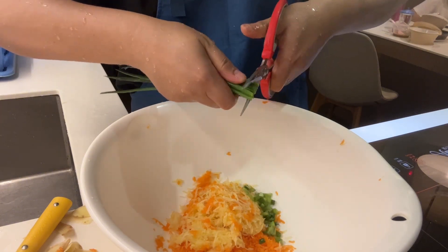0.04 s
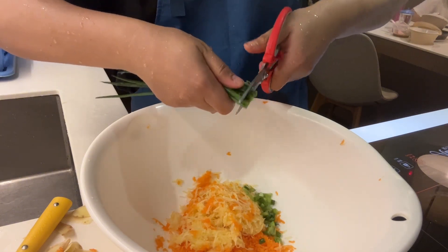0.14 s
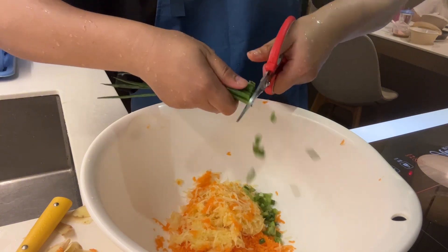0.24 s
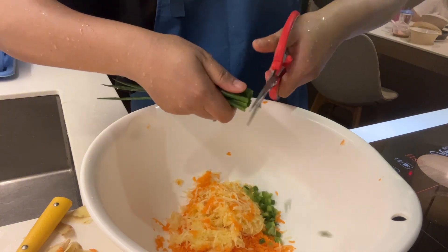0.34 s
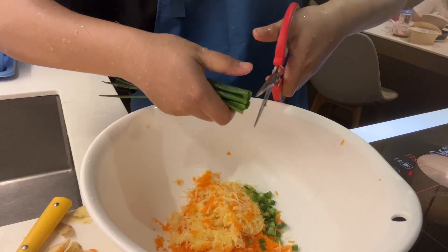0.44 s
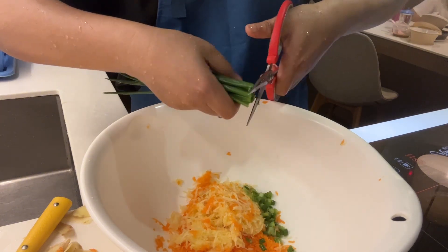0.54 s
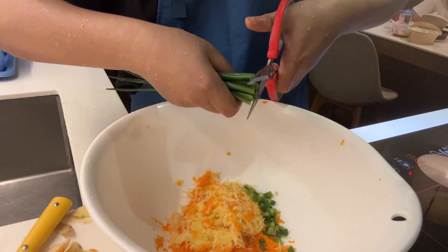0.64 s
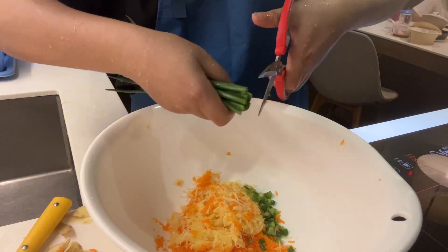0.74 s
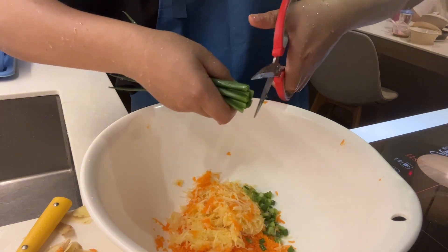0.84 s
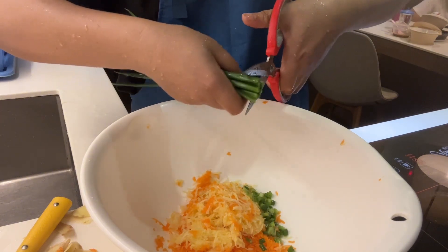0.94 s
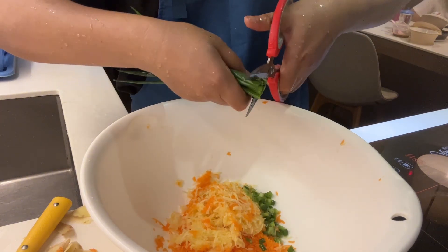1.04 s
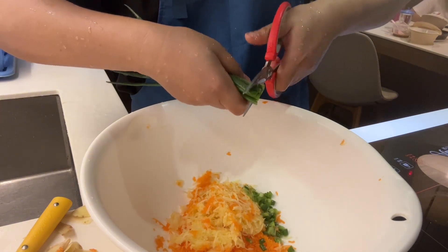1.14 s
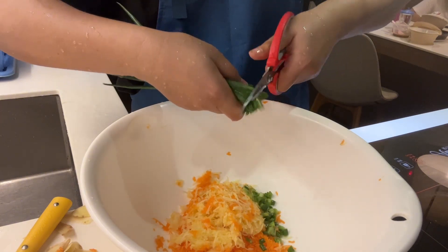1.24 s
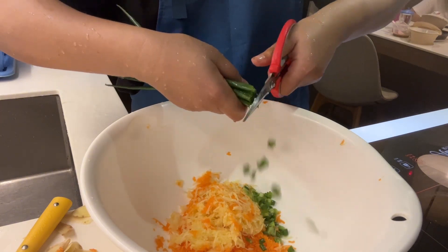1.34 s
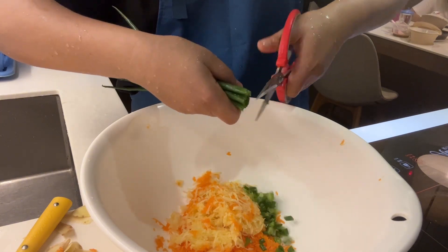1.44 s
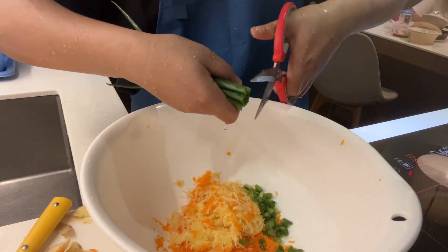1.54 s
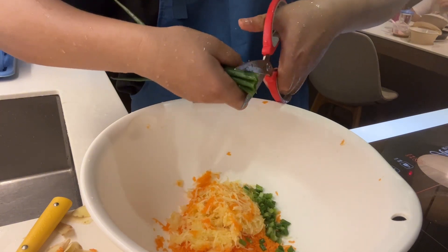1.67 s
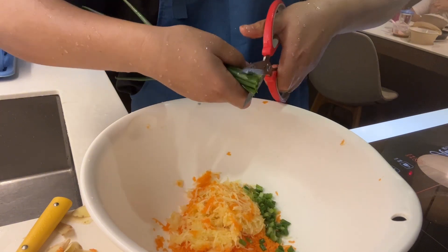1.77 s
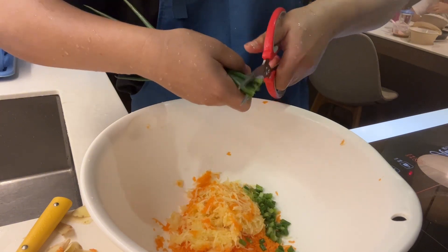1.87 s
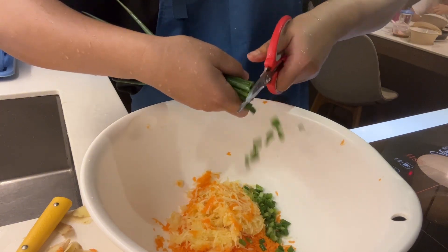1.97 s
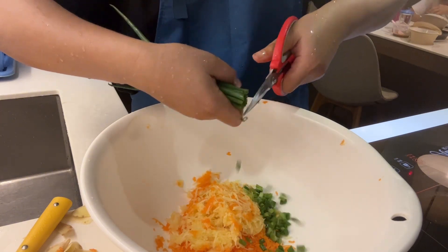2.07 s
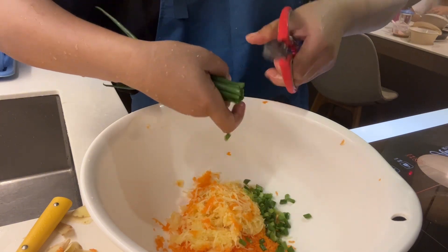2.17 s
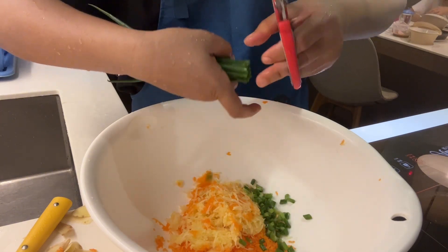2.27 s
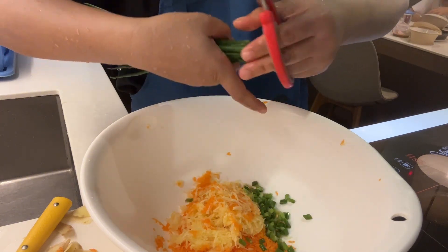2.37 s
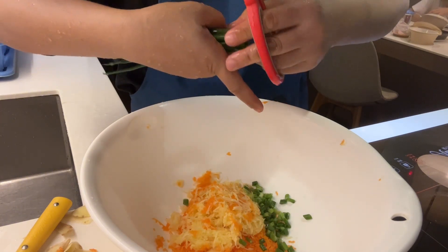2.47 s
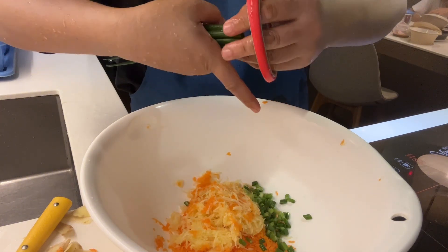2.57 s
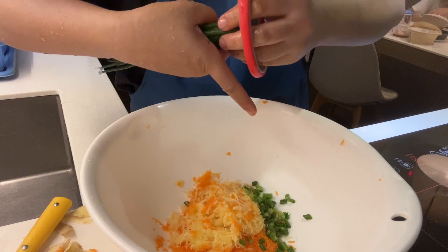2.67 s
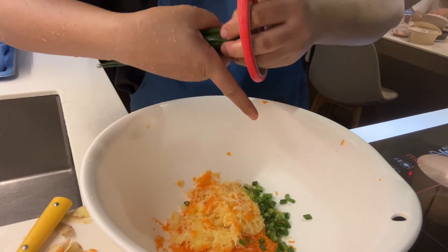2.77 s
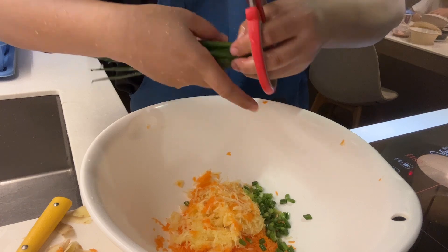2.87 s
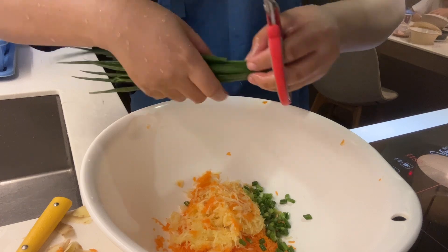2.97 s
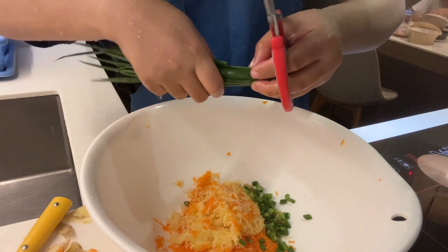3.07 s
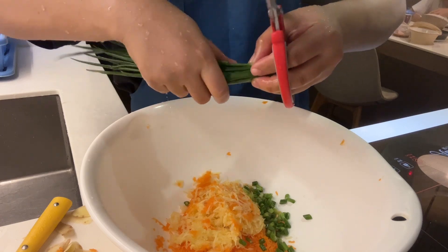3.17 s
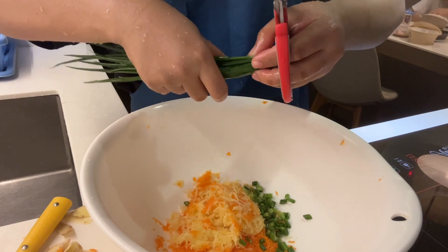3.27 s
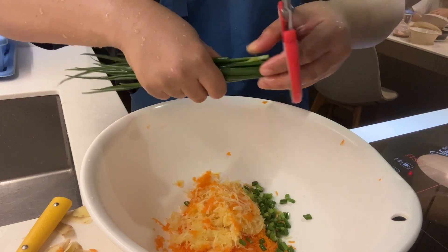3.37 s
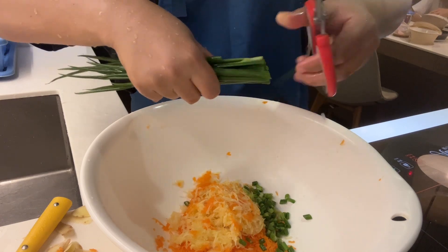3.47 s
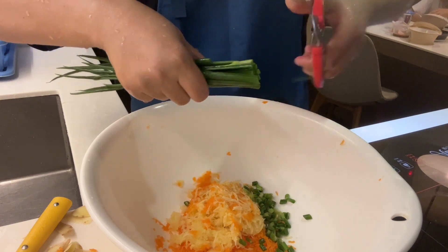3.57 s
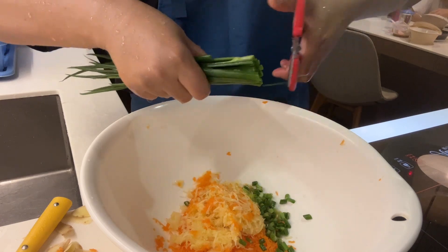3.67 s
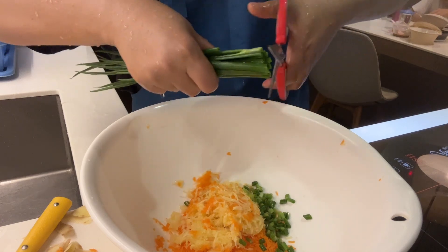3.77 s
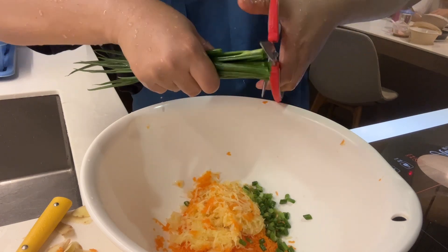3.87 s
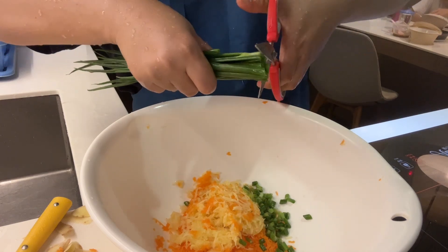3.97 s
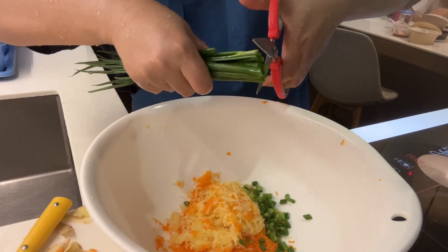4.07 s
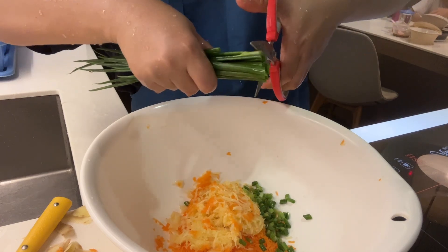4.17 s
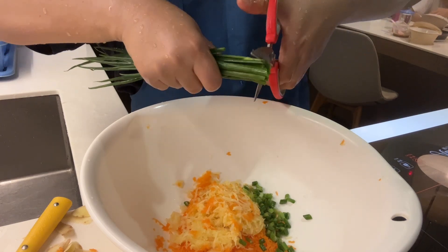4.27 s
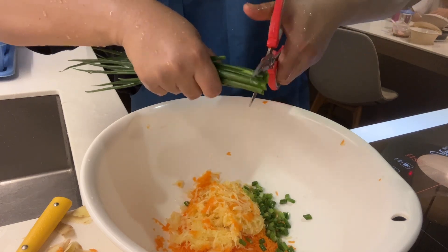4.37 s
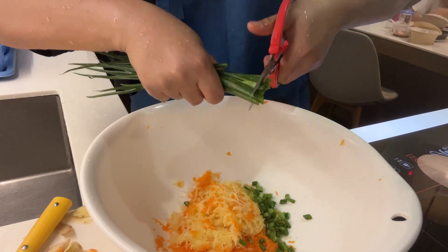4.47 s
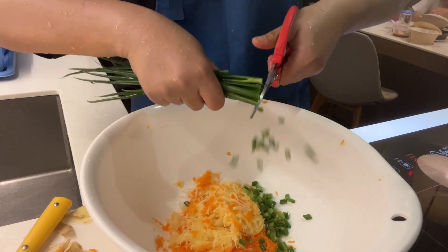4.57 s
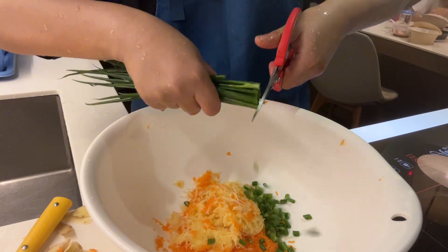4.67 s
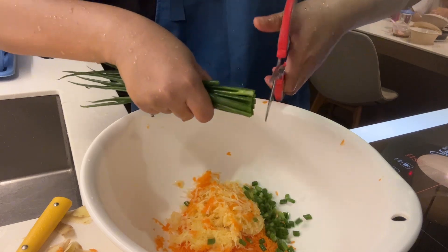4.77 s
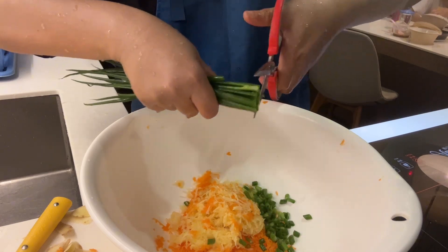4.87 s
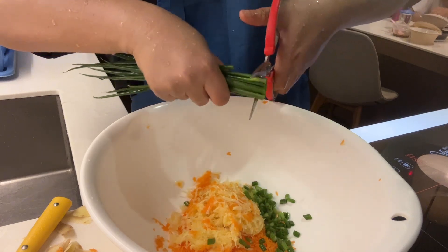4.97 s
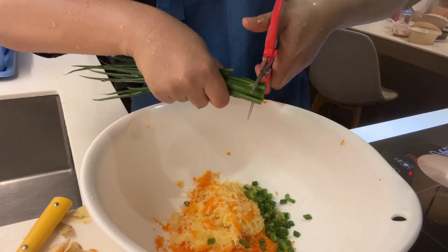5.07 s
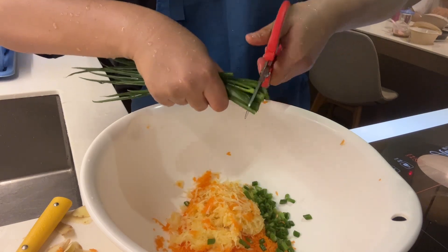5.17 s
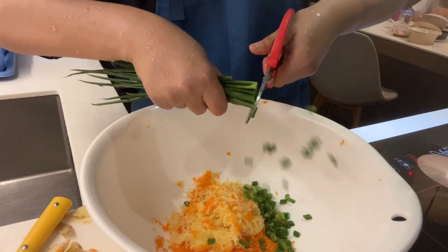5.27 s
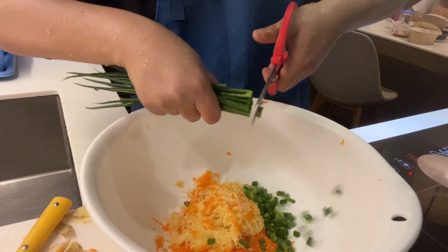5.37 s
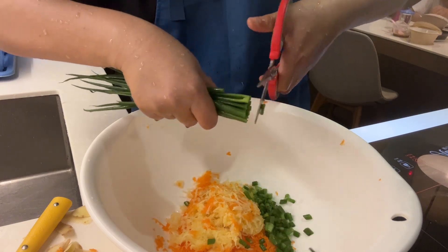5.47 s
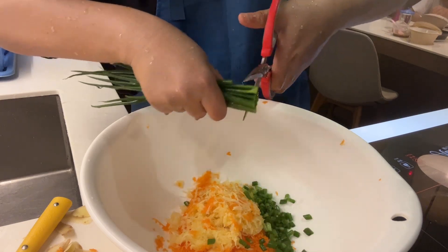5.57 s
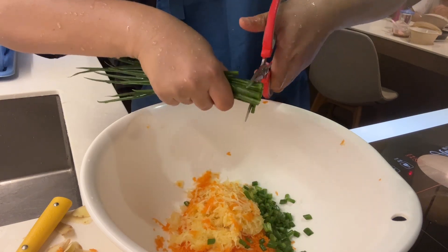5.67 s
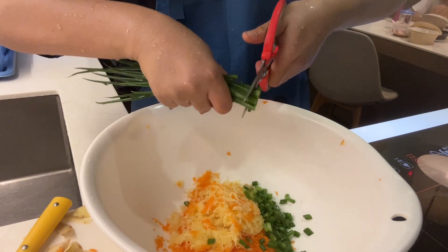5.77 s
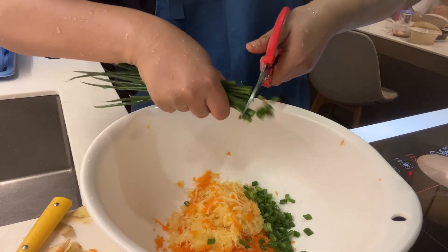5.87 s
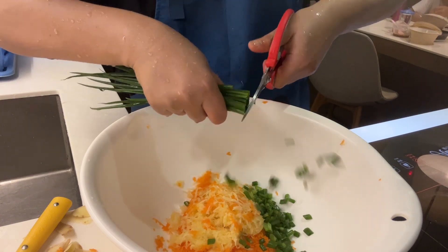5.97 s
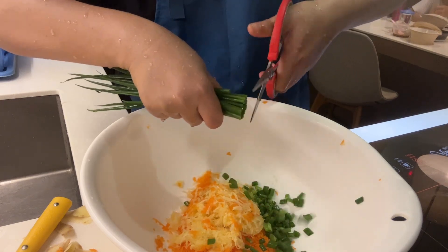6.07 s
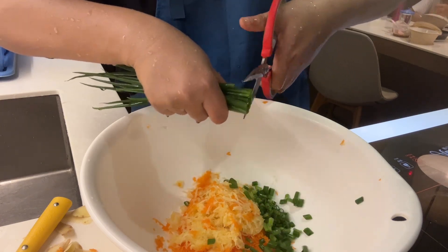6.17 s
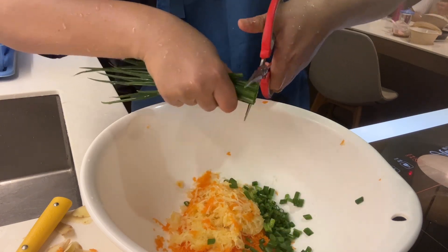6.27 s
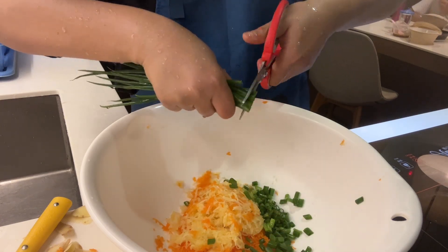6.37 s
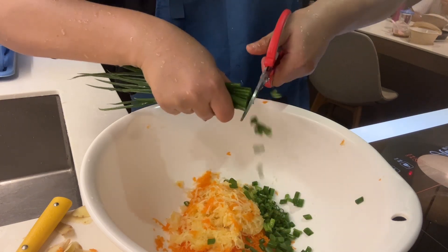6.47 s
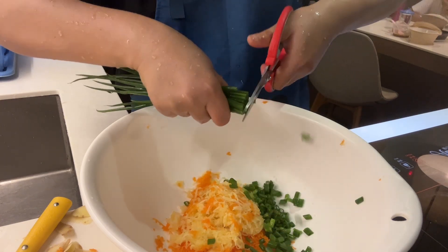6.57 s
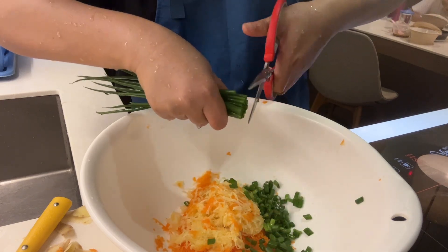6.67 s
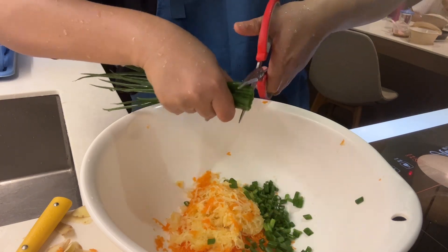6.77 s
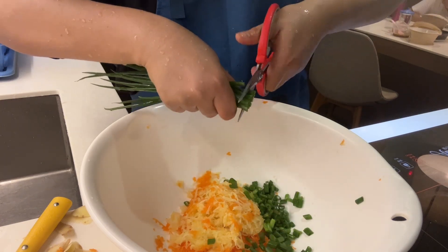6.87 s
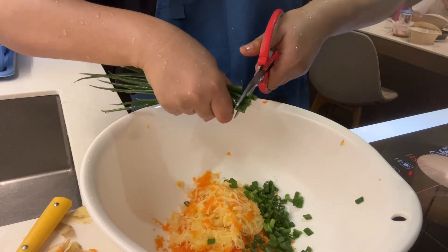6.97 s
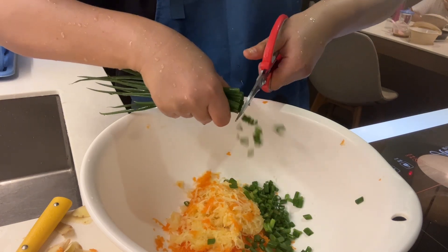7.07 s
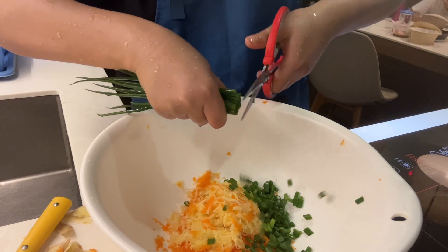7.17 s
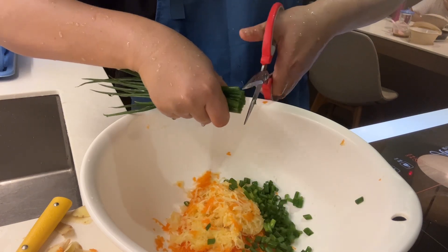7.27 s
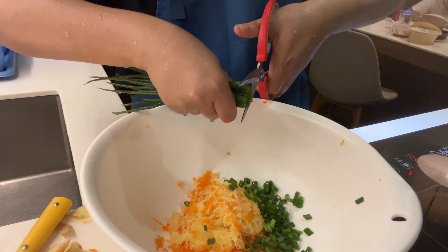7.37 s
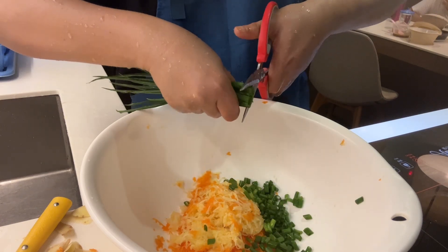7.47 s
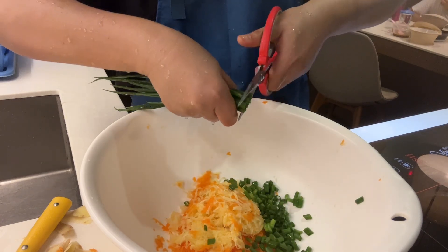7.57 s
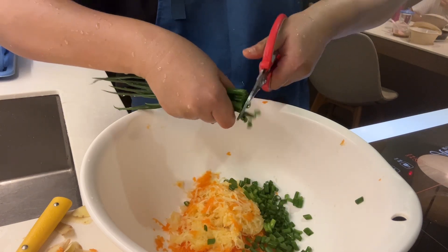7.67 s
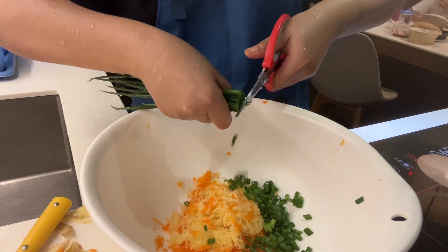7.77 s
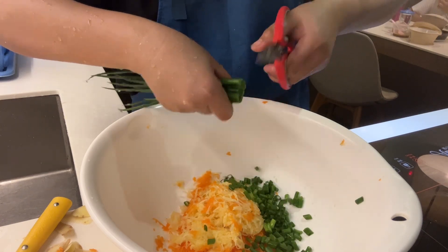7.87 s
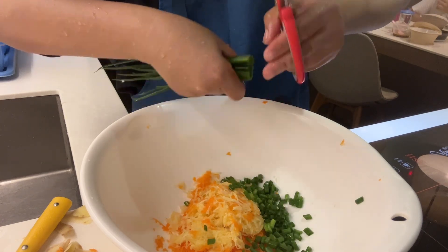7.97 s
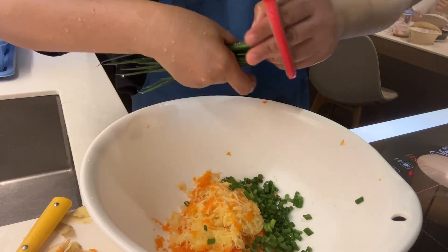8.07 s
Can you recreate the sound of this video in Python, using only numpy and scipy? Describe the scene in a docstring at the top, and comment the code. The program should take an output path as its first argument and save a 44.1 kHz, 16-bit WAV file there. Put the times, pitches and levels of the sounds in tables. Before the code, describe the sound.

A close stereo view of a home kitchen with low fridge-like hum, soft room noise and very faint buzz throughout. A brief rustle opens, then scissors crunch through spring onions at about 0.1, 1.1 and 1.8 seconds. Each cut swells as a grainy, wet crush with crisp bright tearing, and ends in snapping stalks and a dull jolt of the plastic bowl. Hollow knocks with a short rattle fall near 0.4, 0.6 and 2.1. From 2.2 to 4.3 only stalks rustle and rub in the fingers, with the strongest knock at 3.9. Six more cuts follow near 4.4, 5.1, 5.7, 6.4, 6.9 and 7.6, with another knock at 5.0 and a softer one at 7.4. Small pieces patter into the bowl after cuts, most clearly at 6.0. A last rustle fades into the hum by 8 seconds; reflections are short.

```python
"""Home kitchen, in stereo, scissors and spring onions over a large plastic bowl; room noise, hum and buzz throughout.
Opens on a short rustle, then three cuts in two seconds: swelling noise grains, bursting stalks, the bowl ringing below.
Throughout: knocks (clicks into decaying modes, noise cracks), pieces pattering into the bowl (small taps on its modes),
dull jolts (low modes) and stalks rustling in the fingers (shaped noise). From 4.4 s six more cuts;
after the last cut at 7.6 s, rustles to the end. Dying noise serves as the kitchen's reflections."""
import sys
import numpy as np
from scipy import signal
from scipy.fft import rfft, irfft, next_fast_len
from scipy.io import wavfile

SR = 44100
rng = np.random.default_rng(int(sys.argv[2]) if len(sys.argv) > 2 else 0)


def inscribe(sig):
    """Save sig as 16-bit PCM at rate SR to the path in sys.argv[1].

    A 1-D sig is mono; a 2-D sig holds one channel per row.
    Samples are clipped to [-1, 1] before scaling.
    """
    pcm = np.round(np.clip(np.atleast_2d(sig).T, -1, 1) * 32767)
    wavfile.write(sys.argv[1], SR, pcm.astype(np.int16))


N = 358533   # samples


def from_db(db):
    """Decibels to amplitude gain."""
    return 10 ** (np.asarray(db) / 20)


def rms_one(x):
    """Scale to unit rms."""
    return x / np.sqrt(np.mean(x ** 2) + 1e-20)


def at_hz(points, column):
    """A table column on the FFT frequencies, straight on a log frequency axis."""
    hz = np.fft.rfftfreq(next_fast_len(N), 1 / SR) + 1e-3   # keeps the log finite at zero
    points = np.array(points)
    return np.interp(np.log(hz), np.log(points[:, 0]), points[:, column])


def coloured(x, spectrum):
    """Filter with a (f/Hz, level/dB) curve scaled so that white noise keeps its rms."""
    size = next_fast_len(N)
    gain = rms_one(from_db(at_hz(spectrum, 1)))
    return irfft(rfft(x, size) * gain, size)[..., :N]


def low_passed(x, hz):
    """Second-order low-pass: little gets through above the corner."""
    return signal.sosfilt(signal.butter(2, hz, fs=SR, output="sos"), x)


def resonance(x, hz, width_hz):
    """Two-pole band-pass with gain 1 on top."""
    r = np.exp(-np.pi * width_hz / SR)
    return signal.lfilter([(1 - r * r) / 2, 0, (r * r - 1) / 2], [1, -2 * r * np.cos(2 * np.pi * hz / SR), r * r], x)


def dying(x, length_s):
    """Give every impulse an exponential tail with this time constant."""
    return signal.lfilter([1], [1, -np.exp(-1 / (length_s * SR))], x)


def grains(per_s, spread_db, length_s, bed):
    """Envelope of many short bursts of uneven size on a steady bed; rms 1."""
    sizes = from_db(spread_db * np.minimum(rng.exponential(1, N), 4))
    bursts = sizes * (rng.random(N) < per_s / SR)
    return rms_one(bed + rms_one(dying(bursts, length_s)))


def struck(times, levels_db, tilts_db, modes, spread_db, damping=1):
    """Clicks set decaying modes ringing; each hit meets each mode, in each of two sound paths, with its own strength."""
    at = np.minimum((np.asarray(times) * SR).astype(int), N - 1)
    out = np.zeros((2, N))
    chance = rng.standard_normal((len(at), len(modes), 3))
    centre_hz = np.exp(np.mean(np.log(np.array(modes)[:, 0])))
    for k, (hz, mode_db, t60) in enumerate(modes):
        clicks = np.full((2, N), 1e-18)   # not quite zero, to keep the filter fast
        level_db = levels_db + mode_db + tilts_db * np.log2(hz / centre_hz)
        strength = from_db(level_db[:, None] + spread_db * chance[:, k, :2])
        strength[:, 1] *= np.sign(chance[:, k, 2])
        np.add.at(clicks.T, at, strength)
        r = from_db(-60 * damping / (t60 * SR))
        w = 2 * np.pi * hz / SR
        ring = signal.lfilter([0, np.sin(w)], [1, -2 * r * np.cos(w), r * r], clicks)
        out += ring * (-1) ** k
    return out


def cracks(times, levels_db, pitches_hz, t60s):
    """Dying noise bursts in a broad band whose pitch depends on the spot that is hit."""
    out, t = np.zeros((2, N + SR)), np.arange(SR // 5) / SR
    noise = rng.standard_normal((len(times), 2, len(t)))
    for s, level_db, hz, t60, white in zip(times, levels_db, pitches_hz, t60s, noise):
        burst = white * from_db(-60 * t / t60)
        burst = resonance(resonance(burst, hz, 0.13 * hz), hz, 0.98 * hz)
        start = int(s * SR)
        out[:, start:start + len(t)] += from_db(level_db) * burst / np.abs(burst).max()
    return out[:, :N]


# broad noise of the empty room: f/Hz, relative level/dB per Hz
ROOM_AIR = [(25, -23), (40, 1.5), (70, -11), (120, -12.5), (200, -17.5), (330, -20.5), (480, -33.5),
            (1000, -34), (1550, -37), (2500, -39.5), (5000, -46), (8300, -45), (10500, -58), (15000, -40.5)]
ROOM_AIR_DB = -57.5


def room_air():
    """Broad room noise: steady coloured noise, unrelated in the two paths."""
    return from_db(ROOM_AIR_DB) * coloured(rng.standard_normal((2, N)), ROOM_AIR)


# fridge-like motor tones: f/Hz, width of each of two filter passes/Hz, rms level/dB
MOTOR_HUM = [(46.3, 35.5, -61.5), (87.26, 14, -57), (162.2, 13, -69), (265.2, 6.2, -70.5)]


def motor_hum():
    """Tones that waver because each is narrow noise, sifted twice by a sharp resonance."""
    white = rng.standard_normal((2, N))
    return sum(from_db(db) * rms_one(resonance(resonance(white, hz, width), hz, width)) for hz, width, db in MOTOR_HUM)


# faint mains overtones: f/Hz, rms level/dB
MAINS_BUZZ = [(1400, -91), (1501, -77.5), (1600, -81), (1700, -87), (1800, -103), (2001, -85.5),
              (2202, -84)]


def mains_buzz():
    """Steady sine lines with random phases in the two paths."""
    t = np.arange(N) / SR
    phases = rng.uniform(0, 2 * np.pi, (len(MAINS_BUZZ), 2, 1))
    return sum(np.sqrt(2) * from_db(db) * np.sin(2 * np.pi * hz * t + phase)
               for (hz, db), phase in zip(MAINS_BUZZ, phases))


KITCHEN_T60_S, KITCHEN_TREBLE_T60_S, WALL_CUT_HZ = 0.33, 0.32, 1900


def kitchen(x):
    """Dense reflections: dying noise for each path, the treble dying first."""
    t, size = np.arange(SR // 2) / SR, next_fast_len(N + SR // 2)
    white = rng.standard_normal((2, len(t)))
    low = low_passed(white, WALL_CUT_HZ)
    treble = white - low
    echo = low * from_db(-60 * t / KITCHEN_T60_S) + treble * from_db(-60 * t / KITCHEN_TREBLE_T60_S)
    echo *= np.clip(t / .008 - .5, 0, 1)   # the nearest surfaces answer after a few ms
    echo /= np.sqrt(np.sum(echo ** 2) / 2)
    return irfft(rfft(x, size) * rfft(echo, size), size)[:, :N]


# knocks on the bowl, before layer trims: t/s, peak level/dB, brightness/dB per octave, thump relative level/dB,
# rattle relative level/dB, crack f/Hz, rattle t60/s
KNOCKS_ON_BOWL = [(0.419, -27.5, -2.5, -2.5, -10.5, 2260, 0.073), (0.587, -28, -2, -7, -14.5, 2080, 0.096),
                  (1.0507, -41, -6.5, -1.5, -11, 1640, 0.14), (1.624, -38, -4.5, 0, -8, 1570, 0.45),
                  (2.1212, -24, 6, -29, -14, 2730, 0.097), (3.8608, -20, -2, -6, -15, 2260, 0.18),
                  (4.9774, -27, -3, -7, -10.5, 1710, 0.098), (7.3754, -36, -5, 0.5, -11, 1330, 0.24)]
BOUNCE_S, BOUNCE_DB, BOUNCE_TILT_DB, BOUNCE_THUMP_DB = 0.058, -22.5, -2.5, 6.5


def with_bounces():
    """Columns of the knocks, each followed by its bounce: the bowl rocks back once, softer and duller."""
    rows = np.array(KNOCKS_ON_BOWL)
    bounce = [BOUNCE_S, BOUNCE_DB, BOUNCE_TILT_DB, BOUNCE_THUMP_DB, 0, 0, 0]
    return np.r_[rows, rows + bounce].T


# bowl air and worktop below it: f/Hz, relative level/dB, t60/s
AIR_AND_WORKTOP = [(60.5, -7.5, 0.17), (102.7, -5.5, 0.13), (160, -8, 0.12), (224, -10, 0.068),
                   (251, -9.5, 0.11), (296.1, -0.5, 0.14), (352.5, -0.5, 0.092)]
# dull jolts of the bowl, most of them as the blades break through: t/s, level into the modes/dB
BOWL_JOLTS = [(0.185, -48), (1.285, -46.5), (1.955, -46), (2.342, -62), (4.54, -49.5), (5.247, -43),
              (5.92, -48.5), (6.045, -49), (6.462, -51), (7.034, -53), (7.684, -43)]
THUMP_LAG_S, THUMP_PUSH_HZ = 0.00426, 337
THUMP_TILT_DB, JOLT_TILT_DB = 0.6, 4.0   # per octave


def thumps():
    """The slow push of each knock (a little late) or jolt sets the low modes going."""
    s, peak_db, tilt_db, thump_db, *rest = with_bounces()
    jolt_s, jolt_db = np.transpose(BOWL_JOLTS)
    times = np.r_[s + THUMP_LAG_S, jolt_s]
    levels_db = np.r_[peak_db + thump_db, jolt_db]
    tilts_db = np.r_[np.full(len(s), THUMP_TILT_DB), np.full(len(jolt_s), JOLT_TILT_DB)]
    return low_passed(struck(times, levels_db, tilts_db, AIR_AND_WORKTOP, spread_db=2.5), THUMP_PUSH_HZ)


# bowl wall, undamped: f/Hz, relative level/dB, t60/s
BOWL_WALL = [(598, -1, 0.029), (714, -3.5, 0.021), (900, -6, 0.025), (1020, -27, 0.022),
             (1629, -3.5, 0.051), (1920, -1, 0.022), (2080, 0, 0.052), (2260, 1, 0.032), (2380, -11, 0.095),
             (2910, -8, 0.071), (3450, -20, 0.069), (4050, -11, 0.0086), (4740, -46, 0.0044),
             (5650, -6, 0.0061)]
# bowl shaking on the worktop: f/Hz, relative level/dB per Hz
RATTLE_COLOUR = [(250, -26), (500, 4.5), (900, -4), (1600, 4), (2250, 7), (3200, -18.5), (5000, -16.5),
                 (9000, -74)]


def knocks():
    """A crack and a tick on the wall, then the bowl rattles to rest as grainy dying noise."""
    s, peak_db, tilt_db, thump_db, rattle_db, crack_hz, rattle_t60 = with_bounces()
    shaking, t = np.zeros(N), np.arange(SR // 2) / SR
    starts = ((s + 0.00263) * SR).astype(int)   # the rattle starts a little late
    for start, level_db, t60 in zip(starts, peak_db + rattle_db, rattle_t60):
        shaking[start:start + len(t)] += from_db(level_db - 60 * t / t60)
    shaking *= grains(per_s=890, spread_db=10.5, length_s=0.014, bed=0.43)
    rattle = coloured(shaking * rng.standard_normal((2, N)), RATTLE_COLOUR)
    crack = cracks(s, peak_db, crack_hz, np.full(len(s), .015))
    tick = struck(s, peak_db - 10, tilt_db, BOWL_WALL, spread_db=0.5)
    return tick + crack + rattle


# cut pieces landing in the bowl, before layer trims: t/s, peak level/dB, brightness/dB per octave, crack f/Hz
LANDING_PIECES = [(0.3322, -36.5, -4, 1720), (0.348, -32.5, 1, 2300), (1.402, -32.5, 3, 1810),
                  (1.416, -45, -10, 2094), (1.5358, -50.5, 0, 1600), (2.9, -43, 8, 1720),
                  (3.052, -51, 1, 1230), (3.745, -48, -4.5, 1460), (4.6806, -44, -4, 1580),
                  (4.7187, -38, 13, 2730), (4.774, -47, 0, 2750), (5.3874, -38.5, -3.5, 2020),
                  (6.0232, -28, 1.5, 2250), (6.0299, -23.5, 2.5, 2300), (6.053, -32.5, -1.5, 2440),
                  (6.567, -42, 16.5, 3590), (6.6272, -38, 1, 2480), (6.6366, -36.5, 3, 2980),
                  (7.191, -41, 1, 3010), (7.3392, -50, -1, 2000)]
PATTER_S = 0.032


def pieces(count=8):
    """Each landing is one tap and a few weaker ones on a short patter; the food in the bowl damps the ring."""
    s, peak_db, tilt_db, crack_hz = np.transpose(LANDING_PIECES)
    later = rng.random((len(s), count))
    later[:, 0] = 0
    times = s[:, None] + later * PATTER_S
    levels_db = peak_db[:, None] - 12.5 - (later > 0) * (5.0 + 11.7 * later)
    tilts_db = np.repeat(tilt_db, count)
    taps = struck(times.ravel(), levels_db.ravel(), tilts_db, BOWL_WALL, spread_db=2.0, damping=1.11)
    return taps + cracks(s, peak_db - 3.5, crack_hz, np.full(len(s), 0.07))


def with_shear(gains):
    """The shear of the blades lies midway between the crush and the tearing."""
    low, bright, top = gains
    return np.array([low, np.sqrt(low * bright), bright, top])


# stalks and blades brushed, gripped, pushed, before layer trims: t/s, rise/s, hold/s, rustle level/dB, fall/dB per s,
# low rub relative level/dB, sizzle relative level/dB
HAND_RUSTLES = [(0.0, 0.005, 0.03, -53, 247, -11.5, -4), (0.26, 0.034, 0.069, -56.5, 146, -3, -17),
                (0.559, 0.034, 0.043, -60, 208, 4, -21), (0.681, 0.0086, 0.0064, -62, 308, -4, -5),
                (0.924, 0.014, 0.11, -55.5, 197, -11.5, -6), (1.326, 0.017, 0.076, -58.5, 150, -5.5, -8),
                (1.438, 0.0088, 0.0043, -55, 260, -11, -11), (1.655, 0.063, 0.0084, -52, 400, -8, -3),
                (1.995, 0.02, 0.088, -56.5, 102, -5.5, -7), (2.203, 0.041, 0.063, -81.5, 104, 7, -18),
                (2.467, 0.045, 0.13, -69.5, 200, 1, -2), (2.672, 0.085, 0.065, -50.5, 148, -6.5, -2.5),
                (2.858, 0.023, 0.18, -58.5, 98, -5.5, -10), (3.117, 0.024, 0.028, -54.5, 157, -1.5, -4),
                (3.353, 0.012, 0.03, -56.5, 132, -1, -27), (3.236, 0.028, 0.036, -67.5, 155, 3, -13),
                (3.456, 0.015, 0.012, -77, 200, 4, -17), (3.579, 0.024, 0.005, -59.5, 170, -5, -8),
                (3.71, 0.037, 0.1, -78, 100, 2, -10), (3.84, 0.012, 0.2, -64.5, 74, -4, -16),
                (4.201, 0.015, 0.042, -52.5, 350, -28, -20), (4.3, 0.0067, 0.005, -56.5, 500, -11, -22),
                (4.612, 0.02, 0.042, -57.5, 152, -5, -14), (4.705, 0.013, 0.0078, -58.5, 212, -12, -13),
                (4.871, 0.025, 0.094, -64, 100, -11.5, -3), (4.977, 0.041, 0.01, -61, 198, -7, 0),
                (5.289, 0.099, 0.042, -50, 86, -4.5, -18), (5.627, 0.018, 0.021, -48, 352, -15, -5.5),
                (5.973, 0.02, 0.048, -58, 153, -5, -4), (6.253, 0.015, 0.14, -56, 100, -7, -2),
                (6.524, 0.02, 0.076, -60, 157, -3, -18), (6.812, 0.023, 0.0071, -45.5, 255, -19, -6),
                (7.13, 0.01, 0.042, -58.5, 155, -5.5, -10), (7.404, 0.04, 0.013, -61, 153, -12, -6),
                (7.51, 0.03, 0.03, -69, 198, 1, -7), (7.752, 0.0091, 0.025, -56.5, 92, -4.5, -16),
                (7.876, 0.018, 0.089, -80.5, 150, -8, 13), (8.054, 0.01, 0.08, -81, 145.5, -19, 10)]
RUSTLE_RISE_DB = 16


def rustling_gains():
    """Each rustle rises, holds and falls away."""
    t, out = np.arange(N) / SR, np.zeros((3, N))
    for s, rise, hold, peak_db, fall_db, low_db, top_db in HAND_RUSTLES:
        span = slice(int(s * SR), int(s * SR) + SR)
        age = t[span] - s
        rising_db = RUSTLE_RISE_DB * np.maximum(1 - age / rise, 0)
        falling_db = fall_db * np.maximum(age - rise - hold, 0)
        level_db = peak_db - rising_db - falling_db
        out[:, span] += from_db([level_db + low_db, level_db, level_db + top_db])
    return with_shear(out)


# single stalks bursting, before layer trims: t/s, peak level/dB, crush relative level/dB
STALK_SNAPS = [(0.146, -29, -6), (0.1816, -13.5, -6.5), (1.167, -18, -6.5), (1.187, -22, -14),
               (1.224, -31, -15), (1.2827, -13, -11), (1.827, -27.5, -20), (1.8865, -22, -6),
               (1.9046, -8, -46), (1.9175, -17, -23), (1.9495, -43, 2), (3.3593, -36, -19),
               (3.609, -35, -1), (4.4236, -33, -18), (4.4872, -23, -9), (4.512, -15, -9),
               (4.5384, -11, -14.5), (5.022, -37, -16), (5.111, -38, -18), (5.159, -18.5, -43),
               (5.2416, -31.5, 7), (5.735, -44, 2), (5.8124, -39, -18), (5.8686, -12, -21),
               (5.9044, -19, -22), (5.9284, -17, -8), (6.062, -32.5, 4), (6.3984, -34, 1.5),
               (6.8875, -49, -26), (6.942, -24.5, -4.5), (6.978, -21, -2), (7.0276, -14.5, -11),
               (7.036, -31.5, 14.5), (7.0694, -17, -13), (7.191, -38.5, -7), (7.6122, -26, -13),
               (7.643, -17.5, -13), (7.6835, -32.5, 9)]


def snap_gains():
    """Each stalk gives a crack, then the split runs on."""
    s, peak_db, crush_db = np.transpose(STALK_SNAPS)
    snaps = np.zeros((4, N))
    snaps[:, (s * SR).astype(int)] = with_shear(from_db([peak_db + crush_db - 12, peak_db - 8.5, peak_db - 10.5]))
    return dying(snaps, 0.00012) + from_db(-7.5) * dying(snaps, 0.011)


# blades closing through the bunch, before layer trims: bite t/s, tearing level/dB, swell length/s, level/dB,
# push length/s, level as the last stalks give way/dB, burst length/s, juicy crush at the end relative level/dB,
# sizzle relative level/dB
SCISSOR_CUTS = [(0.08, -54, 0.068, -38.5, 0.031, -28.5, 0.03, -11, -0.5),
                (1.124, -49.5, 0.045, -38.5, 0.09, -29.5, 0.031, -9.5, -0.5),
                (1.812, -51.5, 0.019, -48, 0.078, -30, 0.047, -6, -1),
                (4.382, -47, 0.069, -38, 0.086, -29.5, 0.028, -11, -1.5),
                (5.103, -51.5, 0.051, -39.5, 0.049, -30.5, 0.049, -6, 2),
                (5.747, -44.5, 0.073, -41.5, 0.039, -34, 0.063, -5.5, -0.5),
                (6.365, -53.5, 0.049, -38.5, 0.028, -34.5, 0.036, -4.5, -2),
                (6.899, -47.5, 0.06, -41, 0.079, -40, 0.047, -3, 1),
                (7.566, -55, 0.07, -37.5, 0.043, -28.5, 0.017, -7, -4.5)]
BITE_DB_PER_S, LET_GO_DB_PER_S = 693, 605   # rise to the bite, fall after the break-through
GIVE_WAY_S, CREEP_DB, SAG_DB = 0.0038, 4.5, -1   # the jump; slow change before and after it
CRUSH_EARLY_DB, CRUSH_MIDWAY_DB, CRUSH_GIVING_DB = -5, -8, -4.5   # the crush grows late
SIZZLE_FADES_DB_PER_S = 200   # on top of the let-go: the sizzle dies first


def cutting_gains():
    """Each cut bites, works into the bunch, jumps as the last stalks give way and lets go."""
    out = np.zeros((3, N))
    for bite, bite_db, swell, thick_db, push, burst_db, burst, crush_db, sizzle_db in SCISSOR_CUTS:
        first = max(int(bite * SR) - SR // 10, 0)
        last = min(int(bite * SR) + SR // 2, N)
        t = np.arange(first, last) / SR
        times = np.cumsum([bite, swell, push, GIVE_WAY_S, burst])
        before, after = np.maximum(bite - t, 0), np.maximum(t - times[-1], 0)
        level_db = np.interp(t, times, [bite_db, thick_db, thick_db + CREEP_DB, burst_db, burst_db + SAG_DB])
        level_db = level_db - BITE_DB_PER_S * before - LET_GO_DB_PER_S * after
        crush_path_db = [CRUSH_EARLY_DB, CRUSH_MIDWAY_DB, CRUSH_MIDWAY_DB, CRUSH_GIVING_DB, 0]
        low_db = level_db + crush_db + np.interp(t, times, crush_path_db)
        top_db = level_db + sizzle_db - SIZZLE_FADES_DB_PER_S * after
        out[:, first:last] += from_db([low_db, level_db, top_db])
    return with_shear(out)


def pops(crushing):
    """Juicy cells burst one by one and ring a few cycles, at pitches spread over three octaves."""
    born = rng.random(N) < 260 / SR
    sizes = born * crushing * from_db(5.3 * np.minimum(rng.exponential(1, N), 4)) * rng.choice([-1, 1], (2, N))
    pitches, dealt = np.geomspace(600, 5000, 10), rng.integers(0, 10, N)
    return sum(resonance(sizes * (dealt == k) + 1e-18, hz, hz / 7) * SR / hz for k, hz in enumerate(pitches))


# four kinds of grain, from wet crush to dry sizzle, then fingers on stalks: f/Hz, relative level/dB per Hz
CRUSH_COLOUR = [(200, -13), (400, -13.5), (600, -6.5), (1000, -3.5), (1600, -0.5), (2500, -1.5),
                (4000, -16.5)]
SHEAR_COLOUR = [(1500, -44.5), (2500, -2.5), (4000, 1.5), (5500, 2.5), (7000, -16)]
TEARING_COLOUR = [(4500, -25.5), (6200, -0.5), (7800, 5), (9500, -0.5), (10800, 0), (12000, -33)]
SIZZLE_COLOUR = [(10000, -35), (11500, -5.5), (13500, -2.5), (15000, 4), (16000, 7), (16500, -32)]
RUB_COLOUR = [(300, -39), (700, -2.5), (1200, -0.5), (1700, 4.5), (3000, -3.5), (4500, -12.5)]
# bowl under the cut: f/Hz, width/Hz, level/dB
BOWL_UNDER_CUT = [(322, 15, 20), (598, 46, 18), (998, 59, 14), (1600, 230, 9), (2300, 100, 6.5)]


def onions():
    """Grains of four colours burst partly together, partly on their own; the crush rings the bowl below."""
    own = np.array([grains(per_s=150, spread_db=4.0, length_s=0.01, bed=0.82) for kind in range(4)])
    cutting = own * cutting_gains() * grains(per_s=500, spread_db=4.0, length_s=0.002, bed=4.6)
    handling = own * rustling_gains() * grains(per_s=360, spread_db=0.5, length_s=0.0047, bed=2.1)
    rubbing = handling[0].copy()
    handling[0] = 0   # the low part of handling is rub, not crush
    rub = coloured(rubbing * rng.standard_normal((2, N)), RUB_COLOUR)
    tissue = (cutting + handling)[:, None] * rng.standard_normal((4, 2, N))
    snaps = snap_gains()[:, None] * rng.choice([-1, 1], (2, N))
    crush, shear, tearing, sizzle = tissue + snaps
    crush = coloured(crush, CRUSH_COLOUR)
    crush = crush + sum(from_db(db) * resonance(crush, hz, width) for hz, width, db in BOWL_UNDER_CUT)
    mix = from_db(-6.5) * crush + from_db(-4.0) * coloured(shear, SHEAR_COLOUR)
    mix += from_db(-5.0) * coloured(tearing, TEARING_COLOUR)
    mix += from_db(-0.5) * coloured(sizzle, SIZZLE_COLOUR)
    return mix + rub + from_db(-4.5) * pops(cutting[0] + 0.54 * rubbing)


# left and right by frequency; in the treble they swing between alike and opposed, band by band: # f/Hz, left-
# right likeness (-1 to 1), left minus right level/dB
STEREO_IMAGE = [(30, .94, 2), (60, .86, 3), (125, .9, 1.5), (300, .65, 1), (500, -.1, 5), (1000, .2, 3),
                (2300, -.3, 2.5), (3200, .1, 3), (4800, -.3, 3), (6200, 0.05, 4), (7200, .6, 1.5),
                (7600, .999, 0), (8600, .999, 0), (9000, .5, 0), (9600, -.1, 0), (9950, -.999, 0),
                (10800, -.995, 0), (11300, .1, 0), (11800, .999, 0), (13500, .999, 0), (13900, .3, 0),
                (14400, -.5, 0), (14700, -.998, 0), (16000, -.99, 0)]


def stereo_image(paths):
    """Left and right are sum and difference of two unrelated paths, weighted for likeness at each frequency."""
    size = next_fast_len(N)
    common, opposed = rfft(paths, size)
    alike = np.clip(at_hz(STEREO_IMAGE, 1), -1, 1)
    tilt_db = at_hz(STEREO_IMAGE, 2)
    both = np.sqrt(1 + alike) * common + np.sqrt(1 - alike) * opposed * [[1], [-1]]
    return irfft(both * from_db(tilt_db * [[.5], [-.5]]), size)[:, :N]


CONTACT_HZ = 4160   # soft contacts pass little above this
KITCHEN_DB = -12.5


def scene():
    """Room, bowl and onions are heard directly; onions, bowl and thumps also by way of the kitchen."""
    background = room_air() + motor_hum() + mains_buzz()
    low = thumps()
    bowl = low_passed(knocks() + pieces(), CONTACT_HZ)
    near = onions()
    reflections = from_db(KITCHEN_DB) * kitchen(near + from_db(2.5) * bowl + from_db(7.5) * low)
    return stereo_image(background + reflections + low + bowl + near)


LOW_CUT_HZ, CUTOFF_HZ = 44.8, 16000


def record(dry):
    """The microphones lose the deepest bass; the top is cut steeply."""
    dry = signal.sosfilt(signal.butter(4, LOW_CUT_HZ, "high", fs=SR, output="sos"), dry)
    # the stop band, 80 dB down, begins just above the cutoff
    return signal.sosfilt(signal.cheby2(14, 80, CUTOFF_HZ * 1.03, fs=SR, output="sos"), dry)


dry = scene()
out = record(dry)
inscribe(out)
```